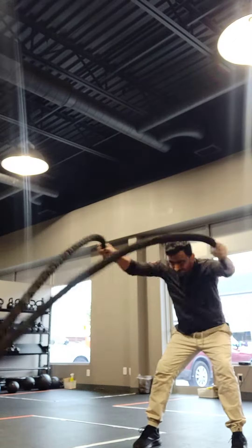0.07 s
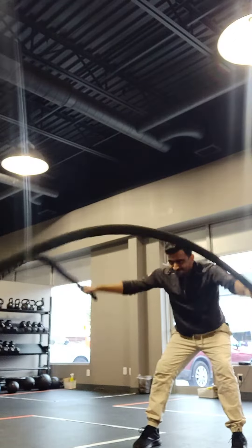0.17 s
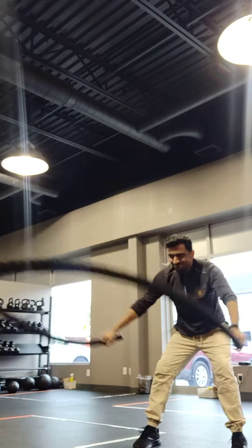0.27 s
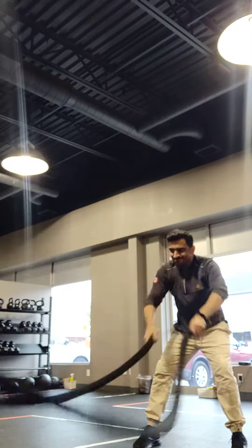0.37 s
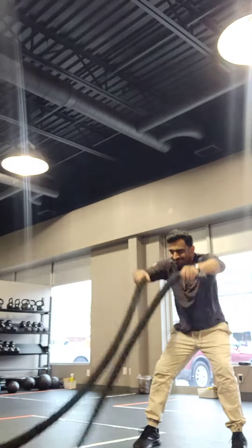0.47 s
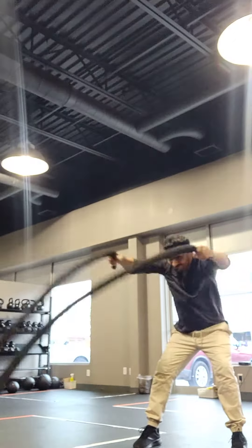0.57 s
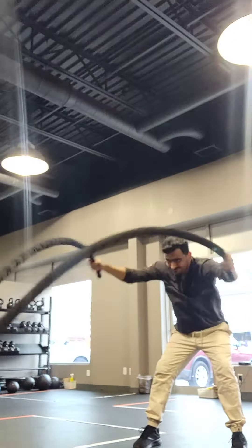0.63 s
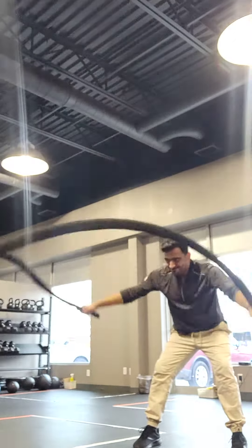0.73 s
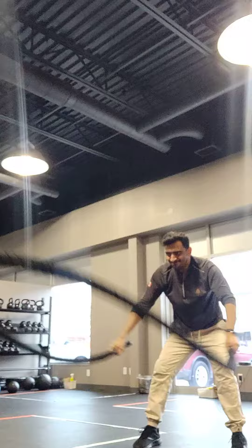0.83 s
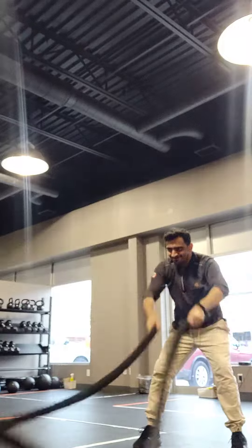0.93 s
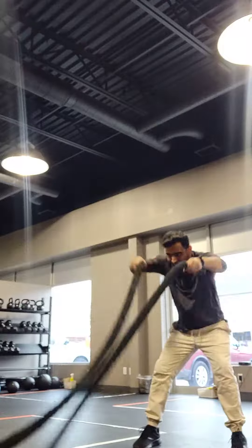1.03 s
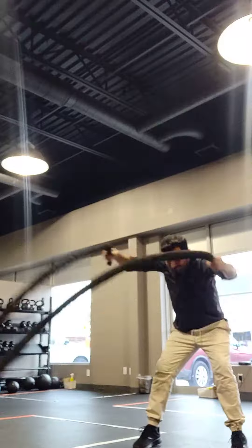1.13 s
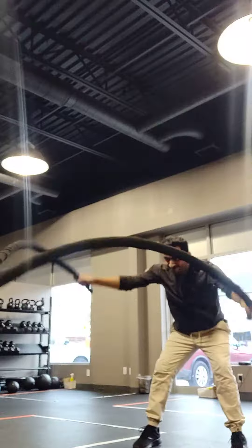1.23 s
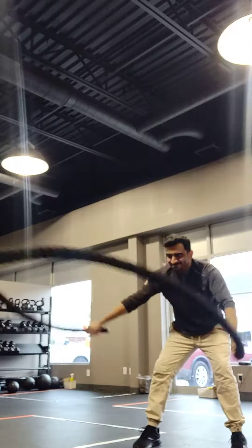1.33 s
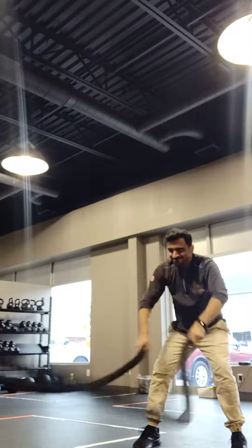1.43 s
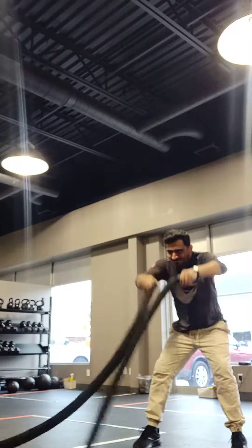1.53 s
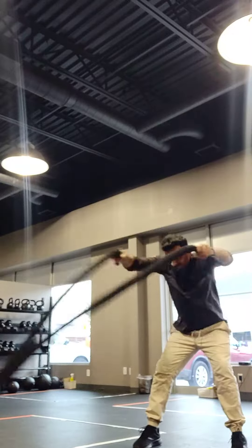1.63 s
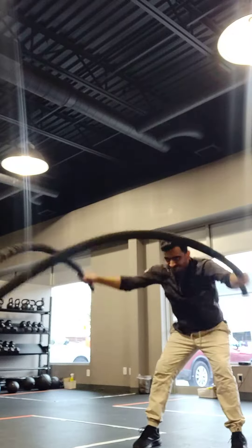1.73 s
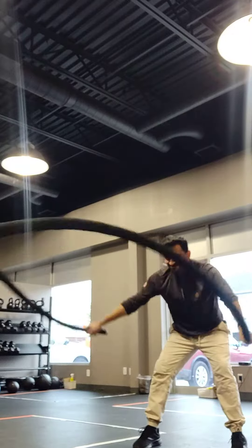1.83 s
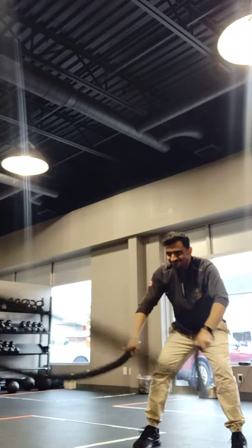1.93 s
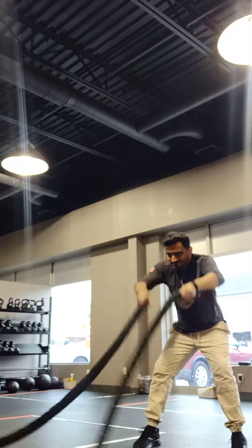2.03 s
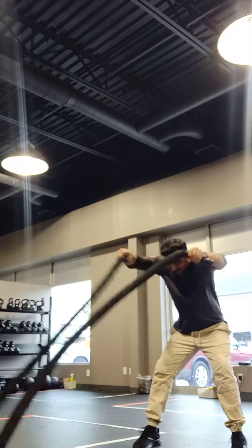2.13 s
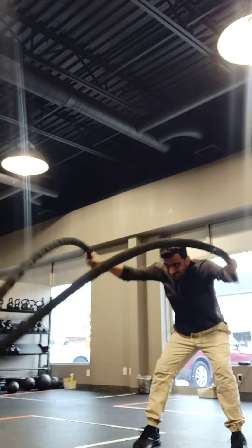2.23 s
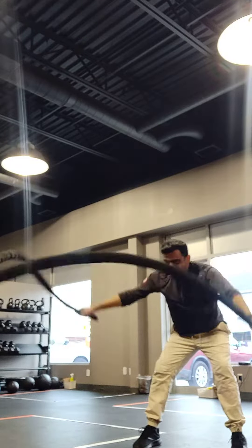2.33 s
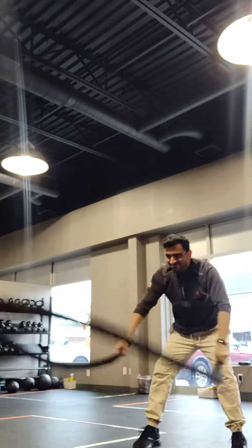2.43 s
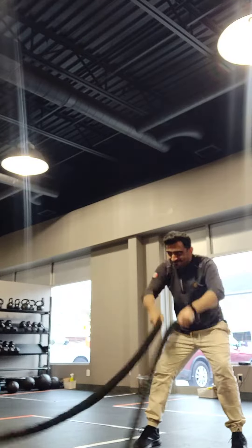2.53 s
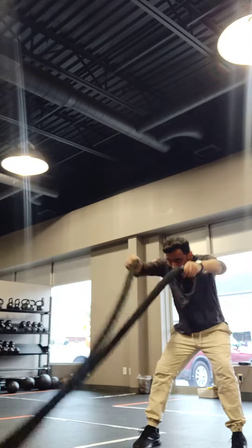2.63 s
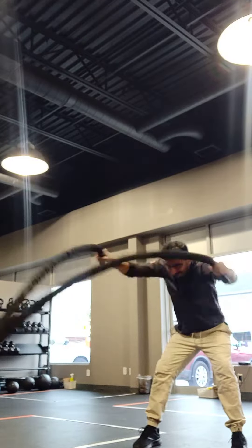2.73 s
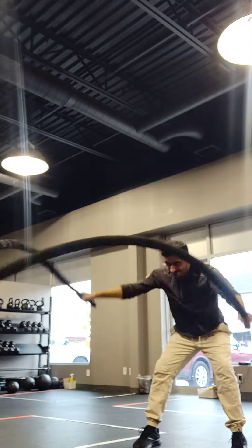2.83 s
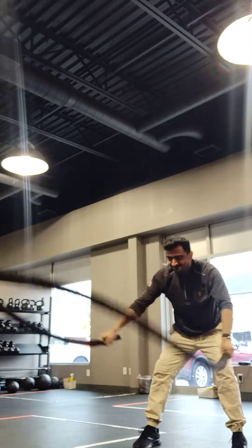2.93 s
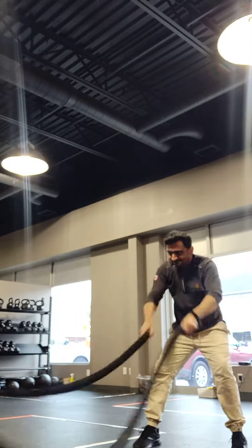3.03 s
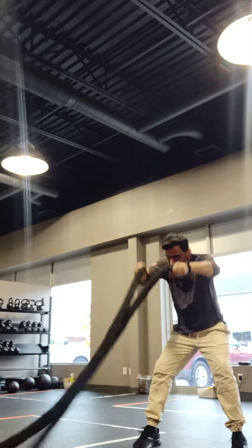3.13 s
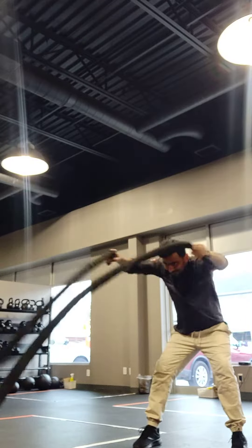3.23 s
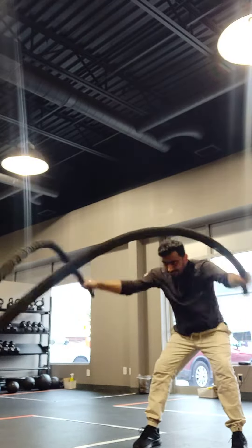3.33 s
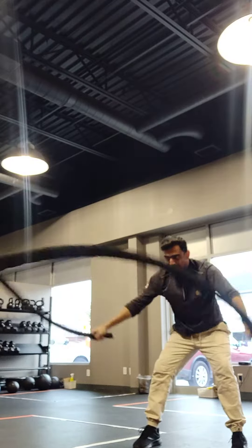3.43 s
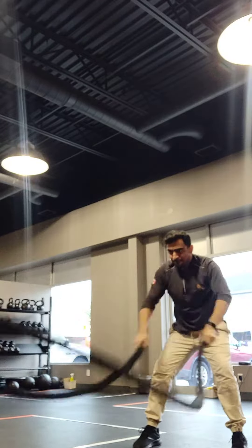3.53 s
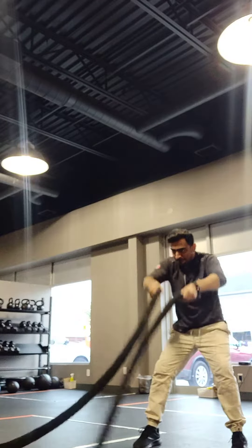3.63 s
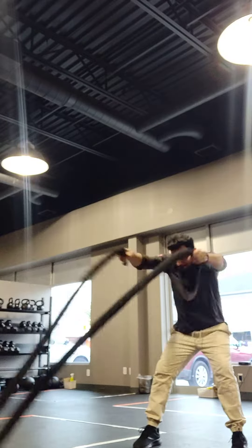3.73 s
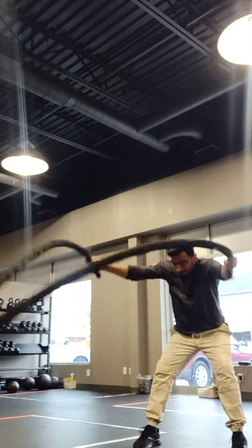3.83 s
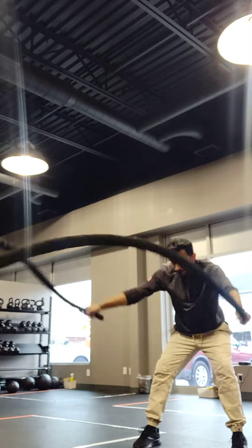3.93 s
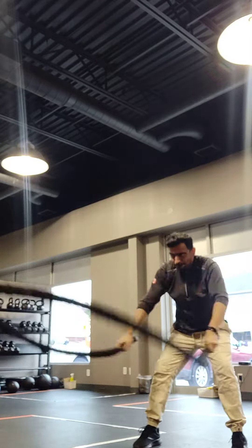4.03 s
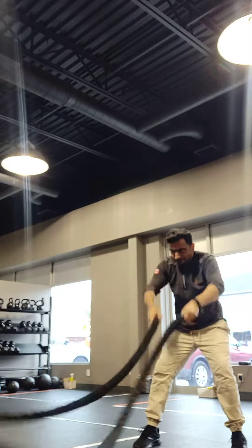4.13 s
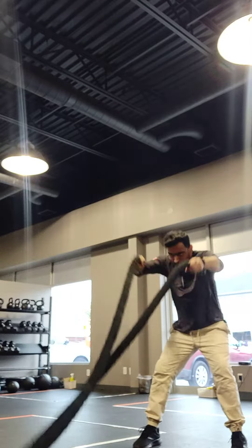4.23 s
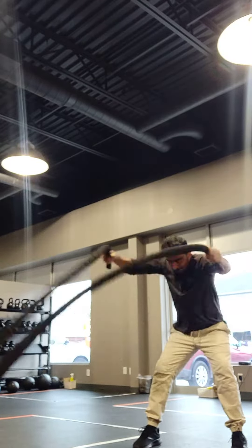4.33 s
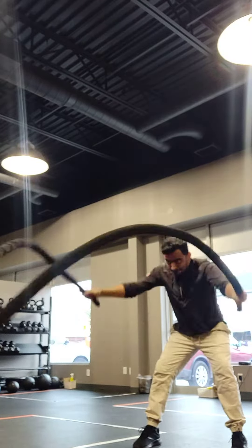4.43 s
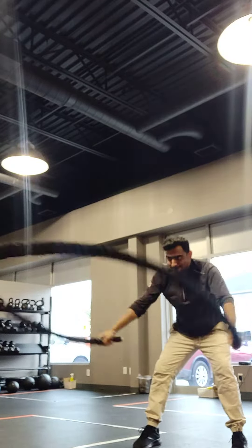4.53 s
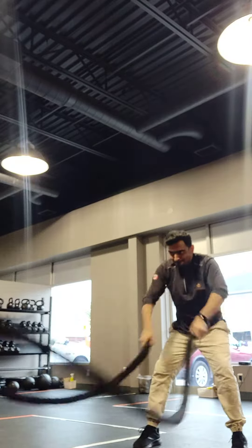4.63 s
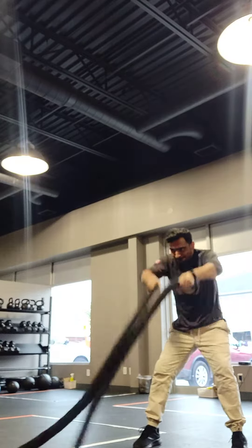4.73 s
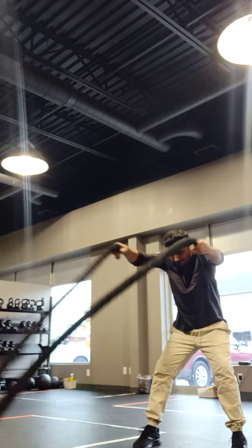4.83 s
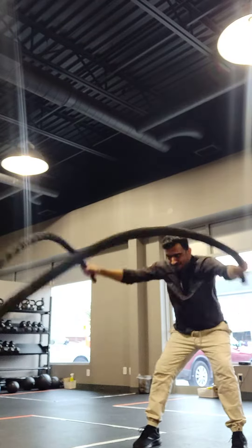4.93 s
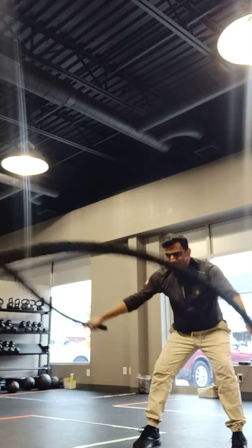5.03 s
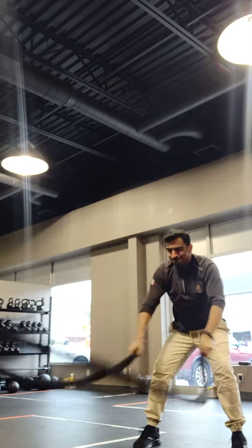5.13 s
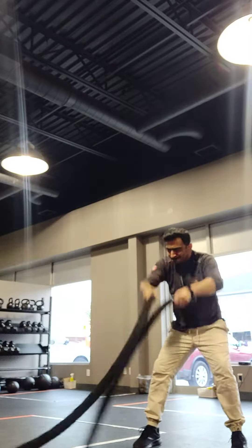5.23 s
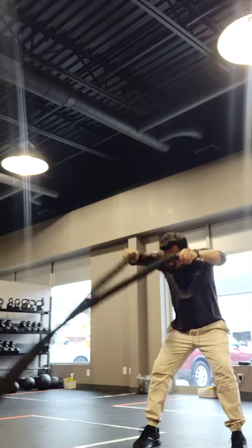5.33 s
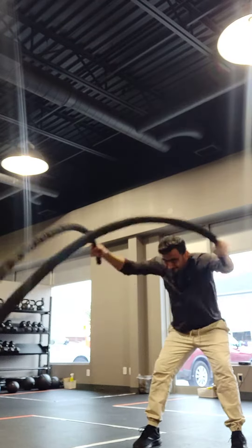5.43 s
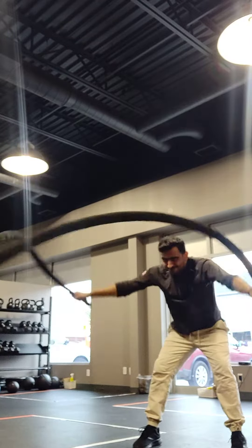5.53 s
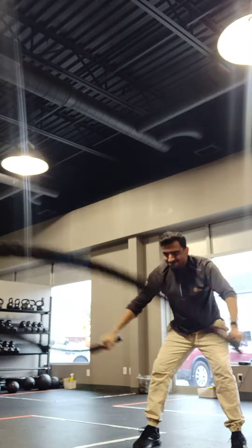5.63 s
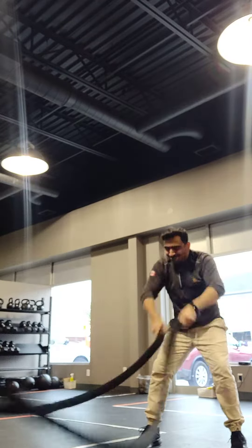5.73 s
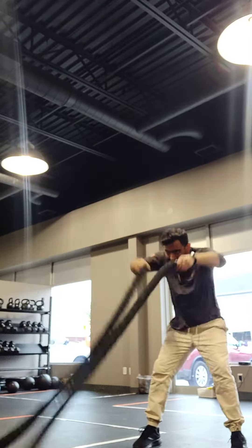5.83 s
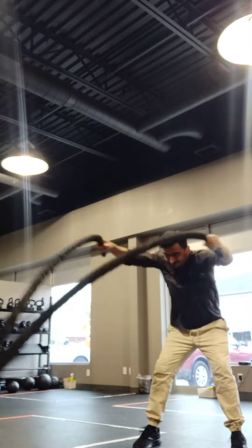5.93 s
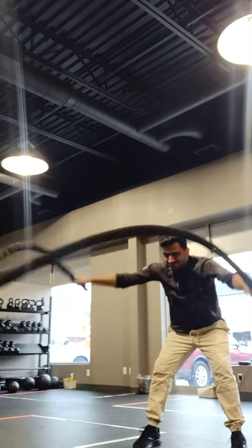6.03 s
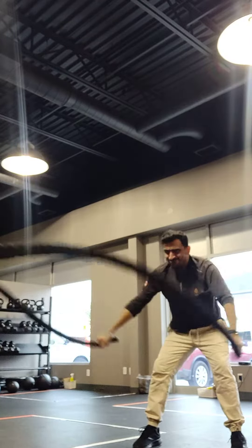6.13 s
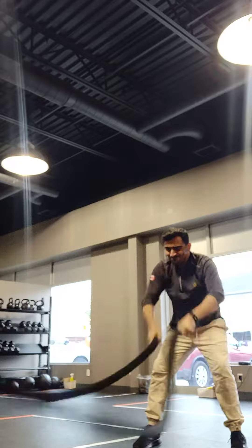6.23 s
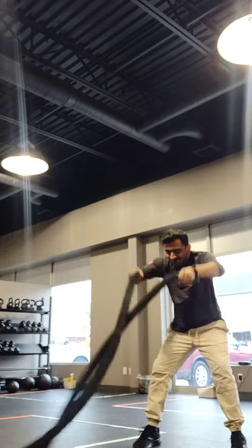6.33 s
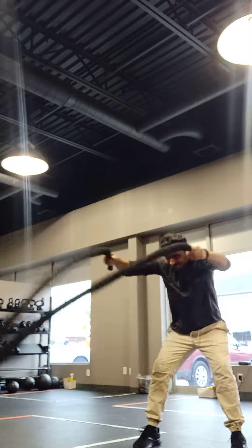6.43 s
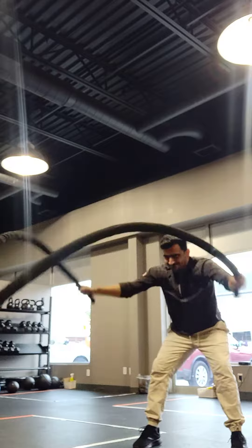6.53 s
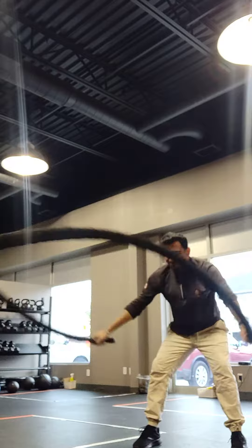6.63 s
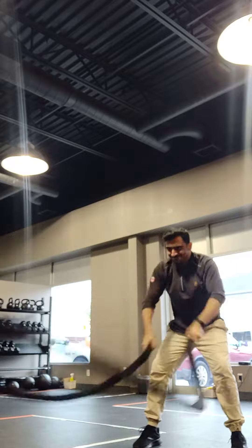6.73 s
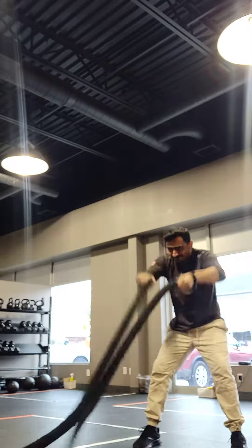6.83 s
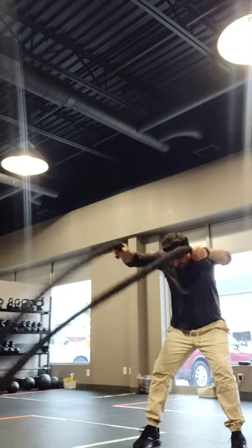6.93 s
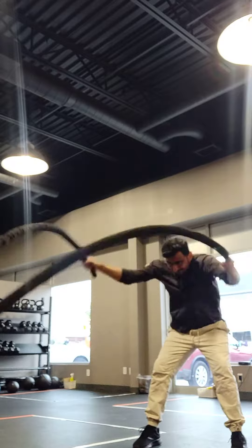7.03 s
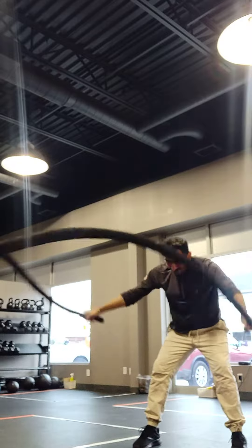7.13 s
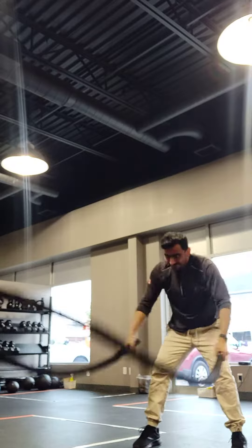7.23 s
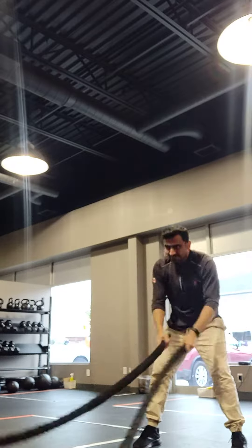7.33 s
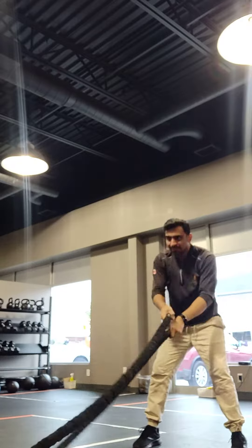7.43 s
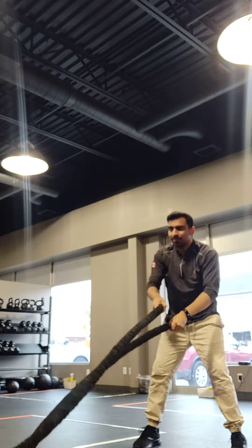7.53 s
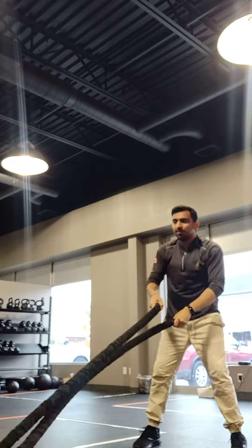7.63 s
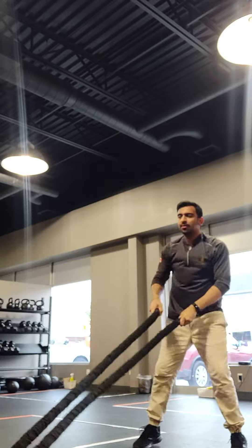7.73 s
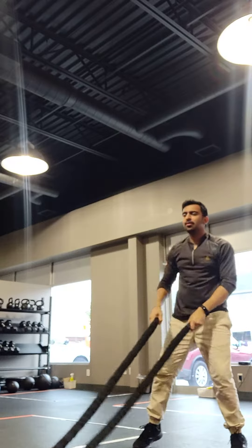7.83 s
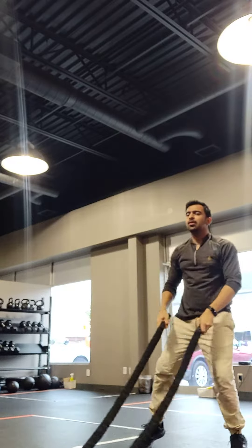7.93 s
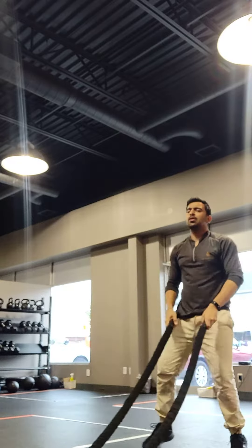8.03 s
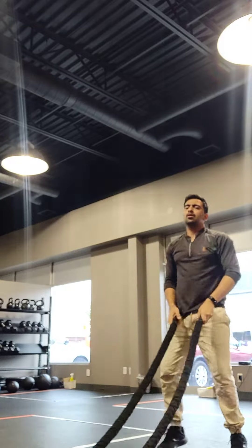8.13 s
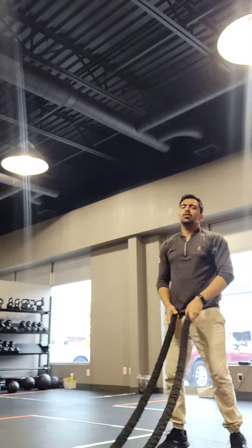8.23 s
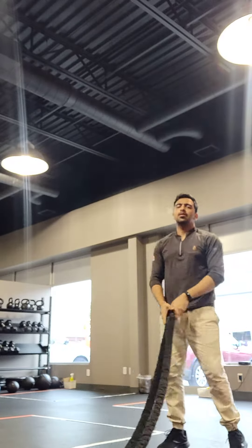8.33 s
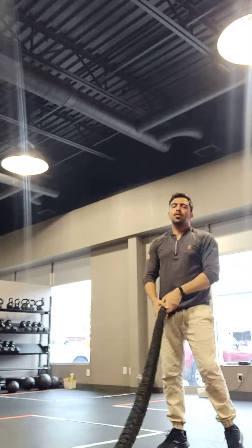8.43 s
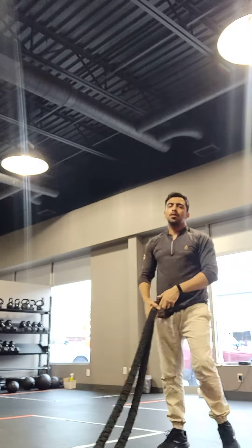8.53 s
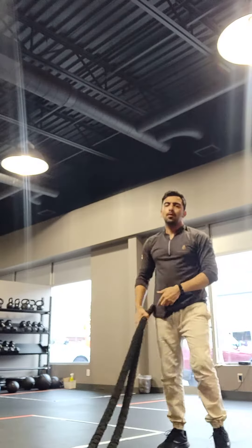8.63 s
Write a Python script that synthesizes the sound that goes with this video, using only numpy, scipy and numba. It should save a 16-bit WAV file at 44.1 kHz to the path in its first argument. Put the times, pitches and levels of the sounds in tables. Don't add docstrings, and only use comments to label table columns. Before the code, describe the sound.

Two heavy ropes slap a rubber gym floor in steady double cracks about twice a second, each trailing a hissing scrape, then drop limp.

```python
import sys
import numpy as np
from scipy import signal
from scipy.fft import rfft, irfft, next_fast_len
from scipy.io import wavfile
from scipy.ndimage import uniform_filter1d
from numba import njit

SR = 44100
rng = np.random.default_rng(int(sys.argv[2]) if len(sys.argv) > 2 else 0)


def transcribe(u):
    v = np.clip(np.atleast_2d(u).T, -1, 1)
    q = np.round(v * 32767).astype(np.int16)
    wavfile.write(sys.argv[1], SR, q)


def boost(x):
    u = np.asarray(x, float) / 20
    return 10 ** u


N = 382347

# frequency in Hz, density in dB per Hz.
AIR_SPECTRUM = [(15, -89), (25, -61), (59, -57), (105, -21), (172, -9), (216, -8.5), (251, -6.5),
                (500, -36), (650, -58), (1100, -120)]
BODY_SPECTRUM = [(35, -57), (60, -30), (172, -10), (230, 0.5), (428, -0.5), (652, -4.5), (860, -9.5),
                 (1400, -5.5), (1820, -65), (3080, -120)]
SCRAPE_SPECTRUM = [(470, -21), (800, -5.5), (1450, 0), (1720, 0), (2080, 1.5), (3030, 1), (4200, 1),
                   (5460, -2.5), (9240, -120)]
HISS_SPECTRUM = [(2060, -5.5), (3500, -0.5), (4350, -4), (6460, 6.5), (6860, 2), (8100, -17), (8600, -21.5),
                 (11200, -35.5), (18900, -120)]
FIZZ_SPECTRUM = [(4590, -28), (7800, -2), (8150, -6), (12500, -13), (13800, -19), (15700, -22)]

# start in seconds, peak in dB.
KNOCKS = [
    (3.2863, -13),
]
# frequency in Hz, level in dB.
STAND_MODES = [(12800, -4), (15300, 3)]
# start in seconds, peak in dB, pitch in Hz, length in seconds,
# fizz in dB over the peak.
BRUSHES = [(0.4635, -7, 5300, 0.011, -27), (0.471, 2.5, 6360, 0.0052, -45), (0.476, -12, 6300, 0.0088, -37),
           (0.491, -10, 6730, 0.0076, -40), (1.568, -14, 5030, 0.014, -21.5),
           (1.655, -21, 5660, 0.012, -25), (2.049, -9, 4300, 0.008, -25), (2.608, -9, 5200, 0.009, -23),
           (2.723, -16, 6100, 0.0093, -28), (3.127, -16, 6360, 0.0036, -20), (3.133, -11, 7400, 0.012, -18),
           (3.247, -15, 5960, 0.012, -16), (3.636, -18, 4150, 0.013, -20), (4.345, -10.5, 6460, 0.018, -30),
           (4.828, -12, 6460, 0.012, -26), (5.407, -8, 5700, 0.0031, -27), (5.88, -13, 6200, 0.01, -25),
           (6.476, -3.5, 5780, 0.011, -29), (6.92, -10, 4000, 0.0088, -32), (6.923, -8, 6300, 0.012, -34),
           (6.969, -15, 4500, 0.014, -14), (7.8, -26, 6000, 0.049, -16), (7.869, -20, 5960, 0.048, -20),
           (7.97, -30, 6000, .045, -13)]
# start in seconds, length in seconds, peak in dB, centre in Hz,
# glide in octaves.
SKIDS = [(0.055, 0.025, -23, 900, -.8), (0.108, .02, -17, 2050, .1), (3.118, .022, -24, 7500, .1),
         (3.128, 0.01, -25, 7850, 0.19), (3.14, .11, -44, 8900, -.1), (3.261, .009, -16, 6300, .1),
         (3.38, 0.14, -23, 2080, .05), (3.433, .1, -25, 3600, -.05), (3.438, .02, -21, 1750, .1),
         (3.51, .04, -26, 2700, -.2), (4.887, 0.045, -24, 850, .6), (4.92, 0.079, -25, 2000, .1),
         (4.998, 0.047, -27, 1150, -0.0069), (5.43, 0.036, -20, 3150, .05), (5.575, .02, -19, 2250, .05),
         (5.605, 0.064, -18, 3050, .05), (5.62, .02, -24, 1500, .05), (6.964, .015, -22, 3000, .1),
         (7.51, .014, -19, 796, -0.047), (7.52, .03, -21, 1360, .1), (7.562, .12, -28.5, 350, .05),
         (7.792, .016, -27, 1800, .1), (8.05, .25, -44, 1500, -.1), (2.8, .1, -24, 3400, .15),
         (7.862, .009, -19, 2100, .05), (7.6, 0.12, -23.5, 2200, .1), (0.648, .012, -17, 2100, .1),
         (1.154, 0.0087, -13, 5800, -.1), (1.176, .005, -14, 6500, .05), (4.36, .008, -17, 3200, .05),
         (4.3695, 0.0036, -11, 2300, 0.048), (3.802, .014, -18, 2200, .1), (2.25, .025, -18, 6400, .05),
         (2.046, .008, -24, 1200, .2), (7.862, 0.0092, -24, 500, .1), (5.117, .2, -31, 1140, .05),
         (8.017, .012, -30, 846, .1)]
# start in seconds, length in seconds, peak in dB,
# centre in Hz.
SCUFFS = [(0.056, 0.06, -20, 1100), (0.693, .15, -17, 2780), (1.248, 0.086, -22, 450),
          (1.288, 0.061, -34, 2600), (1.805, 0.09, -19, 2850), (2.804, 0.1, -16.5, 3120),
          (3.368, 0.09, -20.5, 493), (3.387, 0.15, -23, 2400), (3.462, 0.12, -23.5, 383),
          (3.797, 0.025, -20, 6200), (4.477, 0.12, -19.5, 2630), (4.97, 0.038, -24, 2580),
          (5.45, 0.12, -22, 433), (5.548, 0.074, -14.5, 2920), (6.609, 0.081, -18, 3060),
          (7.06, 0.11, -37, 3300), (7.595, 0.061, -32, 3020), (7.617, 0.065, -27.5, 374),
          (7.842, 0.1, -29.5, 245), (7.952, 0.065, -30.5, 222), (8.523, 0.14, -46, 200),
          (8.524, .13, -45, 4500), (4.351, .014, -22, 3100), (.35, 0.089, -36, 450),
          (1.747, 0.086, -24, 1820), (1.782, 0.46, -39, 223), (2.449, 0.062, -33, 227),
          (2.933, 0.19, -45, 240), (.07, 0.18, -21, 4500), (3.45, 0.12, -30, 3550),
          (3.807, 0.057, -32, 710), (4.096, 0.28, -35, 1160), (4.953, 0.066, -24, 1130),
          (5.187, 0.11, -35, 1030), (5.34, 0.066, -43, 357), (5.435, 0.048, -29, 3150),
          (5.588, 0.088, -29, 446), (5.882, .06, -35, 355), (6.596, 0.068, -18.5, 1810),
          (6.613, 0.048, -22, 720), (6.73, 0.099, -41, 225), (7.216, 0.09, -32.5, 282),
          (7.596, 0.088, -20, 1300), (6.59, .08, -27, 6200), (7.874, .05, -26, 1800),
          (0.03, .013, -17, 2500), (6.96, 0.015, -22, 3200), (5.62, 0.044, -25, 3080),
          (6.626, .05, -33, 3170), (3.795, 0.022, -19, 2000)]

# start in seconds, length in seconds, hiss in dB, scrape in dB,
# body in dB over the scrape.
DRAGS = [(0.046, 0.16, -13, -22, -14), (0.619, 0.2, -13.5, -18, -9.5), (1.145, 0.19, -16.5, -23.5, -5),
         (1.69, 0.19, -17.5, -24.5, -11.5), (2.209, 0.17, -13, -18, -7), (2.729, 0.16, -15.5, -19.5, -15),
         (3.258, 0.15, -17.5, -22.5, -4), (3.796, 0.14, -17.5, -24.5, -17), (4.361, 0.15, -19, -22.5, -7.5),
         (4.878, 0.16, -15, -23.5, -8), (5.412, 0.15, -10.5, -20, -8), (5.942, 0.15, -13, -20, -13.5),
         (6.469, 0.16, -17, -23.5, -7), (6.979, 0.16, -12.5, -19.5, -11), (7.512, 0.17, -14, -21, -14.5)]
# rattle in dB over the scrape, change of the hiss in dB (below 0 it sags), time
# of that change after the start in seconds.
LANDINGS = [(2, 1, 0.023), (2, -1, 0.016), (14, -0.5, .038), (15, 1.5, 0.042), (1, -0.5, 0.036),
            (2.5, 4.5, 0.026), (8.5, -3.5, 0.047), (15.5, 3, 0.012), (-17, 0, .02), (2, -2, 0.044),
            (-6, -5.5, 0.0095), (5, -0.5, 0.02), (10.5, 0.5, 0.02), (4.5, 0, .03), (3, -1.5, 0.02)]
# lag of the scrape behind the hiss in seconds, hiss in dB,
# hiss fade in dB per second, scrape in dB, body in dB over the scrape.
SLIDES = [(0.012, -17.5, 32.5, -19, -13), (0.0059, -21, 27, -21.5, -10), (0.0076, -21.5, 22, -22.5, -5),
          (0.02, -22.5, 17, -21, -10), (0.007, -20.5, 28.5, -20.5, -6), (0.0044, -20.5, 23.5, -21.5, -14),
          (0.16, -23.5, 14.5, -21.5, -3), (0.024, -23, 21.5, -22, -13), (0.12, -23.5, 16, -21, -7.5),
          (0.0033, -22, 20, -23, -9), (0.12, -20, 21, -21.5, -8.5), (0.023, -20, 26.5, -21, -12),
          (0.087, -21, 12.5, -22.5, -6), (0.022, -20, 22, -20, -12), (0.0033, -20.5, 30.5, -20, -12.5)]
# start in seconds, length in seconds, depth in dB.
DIPS = [(.468, .08, -9), (.046, .02, -9), (.626, .021, -8), (2.213, .005, -5), (5.955, .008, -4),
        (6.477, .006, -6), (7.519, .01, -5), (1.18, .008, -5), (1.727, .008, -5), (3.27, .016, -9),
        (3.295, .008, -6), (3.789, .008, -8), (3.822, .018, -8), (4.32, .025, -5), (4.384, .01, -7),
        (4.882, .011, -8), (5.345, .05, -4), (5.42, .016, -5), (6.98, .004, -10), (7.0, .012, -8)]
UPPER_BODY_DB = [2.5, -0.5, 3.5, 0, -2, 0, -1.5, 0.1, -3.5, -5.5, 3, -2, 0.5, -1, 4.5]

# start in seconds, peak in dB, ring in Hz.
TAPS = [(0.0579, -10, 1770), (0.0686, -8, 1790), (0.0719, -11, 2970), (0.0774, -5, 1490), (0.0818, 1, 2110),
        (0.0886, -4, 1700), (0.0929, 2, 1890), (0.6548, -8, 2200), (0.6682, -10, 2500), (1.1559, -10, 3060),
        (1.1742, -9, 1380), (1.1934, -9, 1960), (1.6926, -6, 2480), (1.7, -10, 1060), (1.7049, -9, 1510),
        (1.7105, -6, 3250), (1.7209, -9, 3420), (1.7402, -3, 2910), (2.2159, 0, 1450), (2.2201, -7, 1230),
        (2.2324, -10, 2240), (2.2354, -10, 1980), (2.2443, -10, 3080), (2.2477, -10, 2000),
        (2.2552, -9, 1770), (2.2603, -8, 2970), (2.7352, 2, 2110), (2.7402, -8, 3010), (2.7464, -10, 2090),
        (2.7512, -7, 1140), (2.7612, -8, 2090), (2.7661, -9, 3250), (3.2662, -6, 2970), (3.8057, -11, 2090),
        (3.8116, -9, 2300), (4.3975, -10, 2170), (4.9045, -7, 1980), (5.4334, -10, 3400),
        (5.4408, -10, 3210), (5.4558, -7, 3190), (5.9485, -9, 900), (5.9525, -2, 1320), (5.9693, -7, 2630),
        (5.995, -10, 3570), (6.4801, -9, 2650), (6.4841, -24, 600), (6.509, -10, 2020), (6.9902, -6, 3210),
        (6.9947, -10, 3320), (7.0122, -7, 3210), (7.02, 0, 1940), (7.0263, -10, 3360), (7.5151, -8, 2990),
        (7.5427, -2, 1610), (7.5488, 0, 2170)]
# start in seconds, peak in dB, thump pitch in Hz,
# snap in dB over the thump, crack in dB over the thump.
SLAPS = [(0.04, -10.5, 1260, 10, -3), (0.618, -9, 410, 3.5, -9), (1.1443, -5.5, 1020, -15, 11),
         (1.6864, -8, 925, 5, 14), (2.207, -12, 800, 9, 1), (2.73, -8.5, 690, -2, -1),
         (3.257, -7, 930, -8, 13), (3.784, -5.5, 1200, 8, -13), (4.367, -5, 780, 2, -11),
         (4.876, -9, 656, 8, 11), (5.409, -8, 796, 4, -3), (5.942, 0.5, 1320, -4, -23),
         (6.471, -2, 1500, -16, -17), (6.983, -14.5, 314, 3.5, -4), (7.5101, -13.5, 358, 13, 6)]
BOUNCES = [(0.062, -11, 770, 4, 0), (0.646, -28, 1420, 6, 2), (1.158, -12.5, 1410, 3, -5),
           (1.165, -5.5, 640, -8, -7), (1.308, -22.5, 348, 14.5, -9), (1.703, -8, 1400, -3, 16),
           (1.713, -11, 360, 5.5, -6), (1.734, -19, 1290, 9, 1), (2.22, -5, 1270, -10.5, 5.5),
           (2.224, -13, 308, 7, -9), (2.753, -14, 1420, 10, 1), (3.2853, -3.5, 1100, -6, -2),
           (3.799, -11, 1420, -10, 14), (4.892, -15, 947, 4, 8), (4.905, -15, 1110, 8, -2),
           (5.957, -19, 1410, -2, -1), (6.484, -10, 634, -10, -3), (6.917, -21, 1130, 8, 15),
           (6.983, -8, 2120, -10, 0.5), (7.012, -25, 1490, 4, 8), (7.533, -14, 1350, -10, 1)]
DROPS = [
    (3.7777, -7, 1800, -9, -16),
    (7.864, -16, 900, 11.5, -16),
    (8.022, -19, 1100, -12, -16),
    (8.55, -39, 402, 2, -12),
]

# time in seconds, share cancelled from 0 to 1.
SHADOW = [(0, 0.7), (1.9, 0.66), (2.2, 0.2), (3.0, .2), (3.3, 0.1), (8.67, .05)]
SHADOW_HZ = 3670


def level(x, db):
    return x * boost(db) / np.sqrt(np.mean(x ** 2))


def colour(x, table):
    hz, db = np.transpose(table)
    size = next_fast_len(len(x))
    log_hz = np.log(np.arange(size // 2 + 1) * SR / size + 1)
    outside = np.maximum(np.log(hz[0]) - log_hz, 0) + np.maximum(log_hz - np.log(hz[-1]), 0)
    gain = boost(np.interp(log_hz, np.log(hz), db) - 60 * outside)
    return irfft(rfft(x, size) * gain, size)[:len(x)]


def band(x, lo_hz, hi_hz):
    return signal.sosfilt(signal.butter(2, [lo_hz, hi_hz], "band", fs=SR, output="sos"), x)


@njit
def sweep(x, hz, q):
    y, b, l = np.empty(len(x)), 0., 0.
    for i in range(len(x)):
        g = np.tan(np.pi * hz[i] / SR)
        v = (b + g * (x[i] - l)) / (1 + g * (g + 1 / q))
        b, l, y[i] = 2 * v - b, l + 2 * g * v, v / q
    return y


def notch(x, hz, q, share):
    return x - np.clip(share, 0, 1) * sweep(x, np.full(N, 1. * hz), 1. * q)


@njit
def follow(x, attack, release):
    y, e = np.empty(len(x)), 0.
    for i in range(len(x)):
        e += (x[i] - e) * (attack if x[i] > e else release)
        y[i] = e
    return y


def walk(rate):
    k = int(SR / rate)
    held = np.repeat(rng.standard_normal(N // k + 1), k)
    return 2.28 * uniform_filter1d(uniform_filter1d(held, k), k)[:N]


def add(out, s, sound):
    i = max(int(s * SR), 0)
    out[i:i + len(sound)] += sound[:len(out) - i]


def contact():
    stop_s, settle_s = 8.0, 0.38
    attack_s, peel_s = 0.0035, 0.04
    airborne_s, airborne_db = 0.043, -1.5
    approach_s, approach_db = 0.0061, 2
    fizz_land, fizz_drag, fizz_slide, fizz_hush, fizz_approach = -15, -24.5, -30.5, -35, -35
    t = np.arange(N) / SR
    first = DRAGS[0][0] - attack_s
    ends = [row[0] - attack_s for row in DRAGS[1:]] + [stop_s]
    fibre = [(first, -30, -40)]  # s, hiss dB, fizz dB over it
    weight = [(first, -25, -3, -4)]  # s, scrape dB, body dB over it, dull share dB below 1.8 kHz
    for drag_row, slide_row, landing, end in zip(DRAGS, SLIDES, LANDINGS, ends):
        s, length, hiss, scrape, body = drag_row
        lag, slide_hiss, fade, slide_scrape, slide_body = slide_row
        _, sag, sag_s = landing
        peel, hush_start = s + length, end - airborne_s
        lost = fade * (hush_start - peel - peel_s)
        faded = slide_hiss - lost
        fibre += [(s, hiss, fizz_land),
                  (s + sag_s, hiss + sag, fizz_land),
                  (peel, hiss, fizz_drag),
                  (peel + peel_s, slide_hiss, fizz_slide),
                  (hush_start, faded, fizz_hush),
                  (end - approach_s, faded + airborne_db, fizz_hush),
                  (end, faded + airborne_db + approach_db * (end < stop_s), fizz_approach)]
        peel += abs(lag)
        weight += [(s, scrape + 4.5, body + 1, -4.5),
                   (peel, scrape, body, -3 + 0.67 * body),
                   (peel + peel_s, slide_scrape, slide_body, -4),
                   (end, slide_scrape - 0.88 * lost, slide_body, -5)]
    fibre += [(stop_s + settle_s, -48, -40), (t[-1], -41, -33)]
    weight += [(stop_s + settle_s, -42.5, -7.5, -5), (t[-1], -43.5, -6, 1)]
    fibre, weight = np.transpose(fibre), np.transpose(weight)
    hiss_db, fizz_db = (np.interp(t, fibre[0], column) for column in fibre[1:])
    scrape_db, body_db, dull_db = (np.interp(t, weight[0], column) for column in weight[1:])
    dip_db = sum(db * (1 - 0.6 * (t - s) / length) * ((t > s) & (t < s + length)) for s, length, db in DIPS)
    dip_db = uniform_filter1d(dip_db, size=200)
    return hiss_db + dip_db, fizz_db, scrape_db + 0.95 * dip_db, body_db, dull_db


def air():
    duck_db = -0.59 * np.maximum(contact()[0] + 27, 0)
    swell_db = 1.5 * walk(4)
    rumble = boost(swell_db + duck_db) * level(colour(rng.standard_normal(N), AIR_SPECTRUM), -41)
    return rumble + level(band(rng.standard_normal(N), 30, 16000), -64.0)


def hall(x):
    t60_s, hall_db = 0.67, -9
    t = np.arange(int(.6 * SR)) / SR
    tail = rng.standard_normal(len(t)) * boost(-60 * t / t60_s) * (t > .006)
    return x + boost(hall_db) * signal.fftconvolve(x, tail / np.sqrt(np.sum(tail ** 2)))[:N]


def knocks():
    out, t = np.zeros(N), np.arange(int(.08 * SR)) / SR
    for s, db in KNOCKS:
        jolt = np.sin(2 * np.pi * 75 * t) * np.exp(-t / 0.0037)
        tick = boost(2) * rng.standard_normal(len(t)) * np.exp(-t / 0.0018)
        tick += boost(-21) * band(rng.standard_normal(len(t)), 9000, 15800) * np.exp(-t / 0.008)
        modes = sum(boost(ring_db) * np.sin(2 * np.pi * hz * t) for hz, ring_db in STAND_MODES)
        add(out, s + 0.001, boost(db) * (jolt + tick + modes * np.exp(-t / 0.0012)))
    return out


def brushes():
    out, t = np.zeros(N), np.arange(int(.05 * SR)) / SR
    noise = rng.standard_normal((len(BRUSHES), len(t)))
    for (s, db, hz, length, fizz_db), grit in zip(BRUSHES, noise):
        swell = np.sin(np.pi * np.clip(t / length, 0, 1) ** 0.7)
        rub = band(grit, 0.91 * hz, max(6960, 1.08 * hz))
        rub = level(band(rub, 0.86 * hz, max(6600, 0.6 * hz)), 0)
        fizz = level(band(grit, 7900, 10900) + 0.44 * band(grit, 6800, 15500), fizz_db + 1.5)
        wash = level(band(grit, 900, 5000), -13)
        add(out, s - .003, boost(db - 8) * (rub + fizz + wash) * swell)
    return out


def fibres(smooth):
    snaps_per_s, spread_db = 6000, 3.5
    hit = rng.random(N) < snaps_per_s / SR
    size_db = spread_db * np.minimum(rng.exponential(size=N), 2.2)
    return level(hit * rng.standard_normal(N) * boost(size_db), 0) + smooth * rng.standard_normal(N)


def skids():
    q = 5.9
    out, grains = np.zeros(N), fibres(0.5) * boost(2 * walk(120))
    for s, length, db, hz, glide in SKIDS:
        part, i = np.linspace(0, 1, int(length * SR)), int(s * SR)
        centre_hz = hz * 2 ** (glide * (part - .5))
        ring = sweep(sweep(grains[i:i + len(part)], centre_hz, q), centre_hz, q)
        add(out, s, level(ring, db) * np.sin(np.pi * part) ** .5)
    return out


def scuffs():
    glide_octaves = 0.6
    out, grains = np.zeros(N), fibres(0.31) * boost(1.2 * walk(60))
    for s, length, db, hz in SCUFFS:
        part, i = np.linspace(0, 1, int(length * SR)), int(s * SR)
        centre_hz = hz * 2 ** (glide_octaves * (part - .5))
        q = 1.5 if hz > 1800 else 0.99
        rub = sweep(sweep(grains[i:i + len(part)], centre_hz, q), centre_hz, q)
        add(out, s, level(rub, db) * np.sin(np.pi * part ** 1.3) ** .5)
    return out


def drag():
    hiss_db, fizz_db, scrape_db, body_db, dull_db = contact()
    spectra = (HISS_SPECTRUM, FIZZ_SPECTRUM, SCRAPE_SPECTRUM, BODY_SPECTRUM)
    hiss, fizz, broad, body = (level(colour(fibres(1.6), table), 0) for table in spectra)
    gap_hz = np.clip(2500 * boost(-.7 * (dull_db + 9.5) + .5 * walk(13)), 1300, 3800)
    lift = 0.15 + 0.2 * np.abs(dull_db + 7.0)
    scrape = level(broad + lift * sweep(broad, gap_hz, 2.2), 0) / np.sqrt(.6 + .4 * lift)
    lower = signal.sosfiltfilt(signal.butter(2, 547, fs=SR, output="sos"), body)
    starts = np.transpose(DRAGS)[0]
    wave = np.maximum(np.searchsorted(starts, np.arange(N) / SR) - 1, 0)
    body = boost(np.array(UPPER_BODY_DB)[wave]) * (body - lower) + lower
    for centre_hz in (2900, 4700):
        strength = .5 * boost(2.5 * walk(35))
        whistle_hz = np.clip(centre_hz * boost(1.1 * walk(20)), 1500, 6800)
        hiss = hiss + strength * sweep(hiss, whistle_hz, 5.)
    hiss = level(hiss, 0)
    flutter = 0.19 * walk(25)
    levels_db = hiss_db + 1.5, hiss_db + fizz_db + .2, scrape_db + 0.057, scrape_db + body_db + 0.098
    ranges = zip(levels_db, (hiss, fizz, scrape, body))
    return sum(boost(db + flutter + 0.5 * walk(14)) * x for db, x in ranges)


def patter():
    out, part = np.zeros(N), np.linspace(0, 1, int(0.04 * SR))
    grains = band(fibres(0.33) * boost(1.8 * walk(300)), 900, 3600)
    for (s, _, _, scrape_db, _), (rattle_db, *_) in zip(DRAGS, LANDINGS):
        i = int(s * SR)
        add(out, s, level(grains[i:i + len(part)], scrape_db + rattle_db) * (1 - part ** 3))
    return out


def taps():
    cycles = 2.2
    out, t = np.zeros(N), np.arange(int(.012 * SR)) / SR
    for (s, db, hz), noise in zip(TAPS, rng.standard_normal((len(TAPS), len(t)))):
        ring = np.sin(2 * np.pi * hz * t) * np.exp(-t * hz / cycles) * np.minimum(t / 0.00028, 1)
        grit = boost(-22) * noise * np.exp(-t / 0.0014)
        add(out, s, boost(db - 2) * (ring + grit))
    return out


def slaps():
    out, t = np.zeros(N), np.arange(int(.08 * SR)) / SR
    rows = SLAPS + BOUNCES + DROPS
    fades_s = [0.012] * len(SLAPS) + [0.035] * len(BOUNCES) + [0.016] * len(DROPS)
    noise = rng.standard_normal((len(rows), 2, len(t)))
    for (s, db, hz, snap_db, crack_db), fade_s, grit in zip(rows, fades_s, noise):
        thump = np.sin(2 * np.pi * hz * t) * np.exp(-t * hz / .75)
        thump += boost(-25.5) * np.sin(2 * np.pi * 340 * t) * np.exp(-t / 0.0033)
        decay = np.exp(-6.9 * t / fade_s)
        snap = level(band(grit[0], 1060, 3120), snap_db - 0.5) * decay
        crack = level(band(grit[1], 5000, 15000), crack_db - 8.5) * decay
        add(out, s + .002, boost(db) * (2.6 * thump + snap + crack))
    return signal.sosfilt(signal.butter(3, 230, "high", fs=SR, output="sos"), out)


def hush():
    from_db, ahead_s = -16, 0.003
    t = np.arange(N) / SR - .002
    rows = [row for row in SLAPS + BOUNCES if row[1] > from_db]
    gain_db = sum(-0.8 * (db - from_db) * ((t > s - ahead_s) & (t < s)) for s, db, *_ in rows)
    return boost(uniform_filter1d(gain_db, size=50))


def scene():
    port_hz, port_top_db = 7140, -23.5
    ahead = hush()
    impacts = hall(slaps() + taps()) + ahead * patter()
    hits = notch(impacts, SHADOW_HZ + 200, 4.7, 0.65) + ahead * scuffs()
    dull = signal.sosfilt(signal.butter(8, port_hz, fs=SR, output="sos"), hits)
    top = signal.sosfilt(signal.butter(4, port_hz, "high", fs=SR, output="sos"), hits)
    mono = dull + boost(port_top_db) * top + brushes() + knocks()
    mono += ahead * (drag() + air() + skids())
    cancelled = np.interp(np.arange(N) / SR, *np.transpose(SHADOW))
    mono = notch(mono, SHADOW_HZ, 16, cancelled)
    return np.array([mono, mono])


def thin_top(x):
    hz, _, z = signal.stft(x, SR, "cosine", nperseg=2048)
    size = np.abs(z)
    near = uniform_filter1d(size, size=25, axis=0)
    chance = np.repeat(rng.random((len(hz) // 16 + 1, z.shape[1] // 2 + 1)), 16, axis=0)
    chance = np.repeat(chance, 2, axis=1)[:len(hz), :z.shape[1]]
    dropped = chance < .16 * hz[:, None] / 12000
    top = np.sum(size[hz > 12000] ** 2, axis=0)
    steady = top < 2.5 * uniform_filter1d(top, size=9)
    lost = steady & (hz[:, None] > 8000) & (dropped | (size < 1.05 * near))
    return signal.istft(np.where(lost, 0, z), SR, "cosine", nperseg=2048)[1][:N]


def top_cut(x):
    return signal.sosfilt(signal.butter(12, 15850, fs=SR, output="sos"), x)


def record(dry):
    attack_s, release_s = 0.00053, 0.052
    loud = follow(np.abs(dry[0]), 1 / (attack_s * SR), 1 / (release_s * SR))
    loud = uniform_filter1d(loud, size=130)
    ducked = dry[0] * (boost(-10.0) / np.maximum(loud, boost(-7.0))) ** 0.37
    seamed = notch(ducked, 7900, 29, 0.59)
    mono = thin_top(np.clip(seamed, -.95, .95))
    mono = signal.sosfilt(signal.ellip(8, .2, 60, 15850, fs=SR, output="sos"), mono)
    return top_cut(np.array([mono, mono]))


dry = scene()
out = record(dry)
transcribe(out)
```